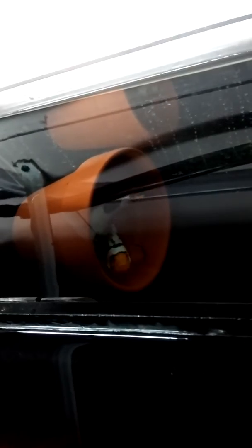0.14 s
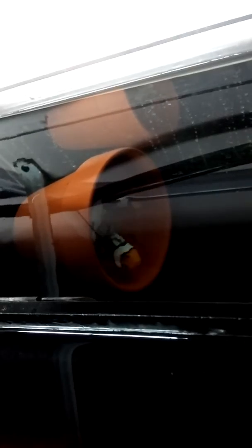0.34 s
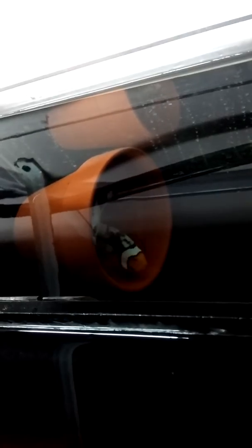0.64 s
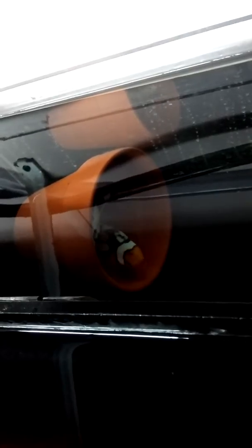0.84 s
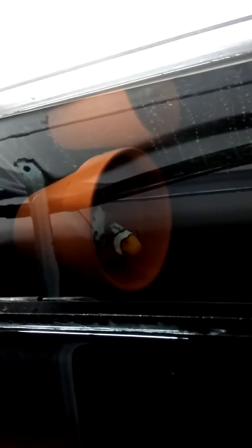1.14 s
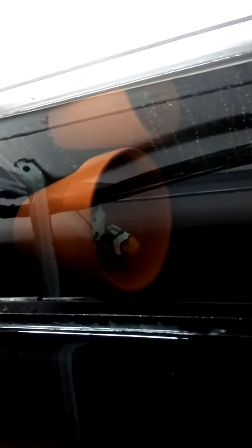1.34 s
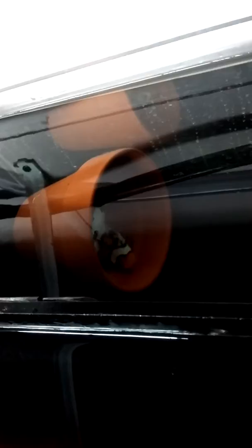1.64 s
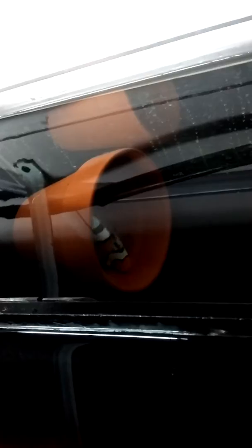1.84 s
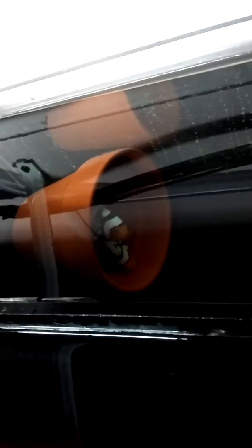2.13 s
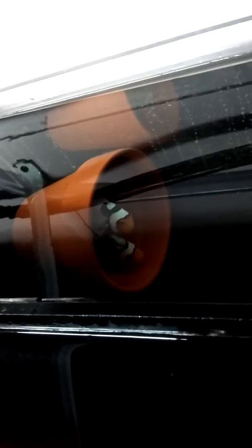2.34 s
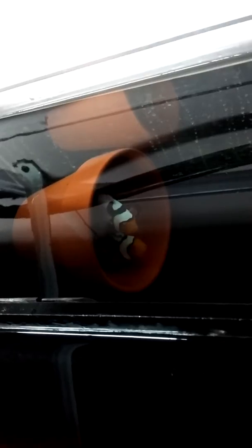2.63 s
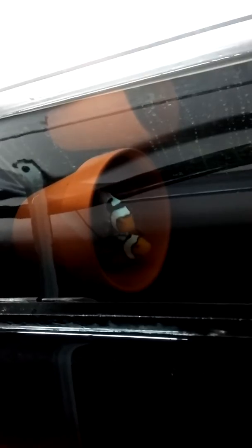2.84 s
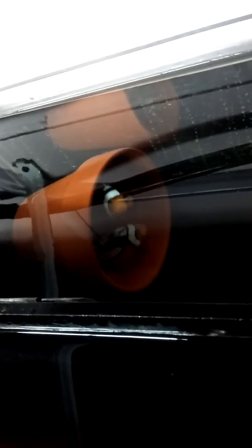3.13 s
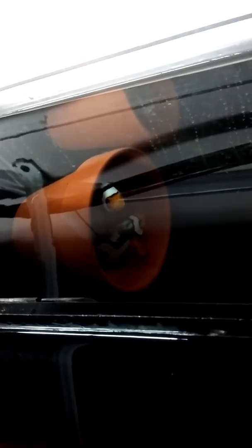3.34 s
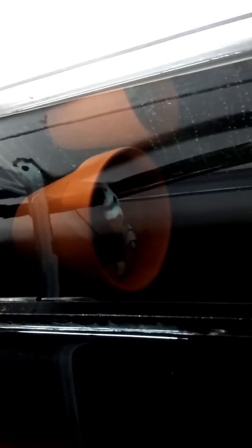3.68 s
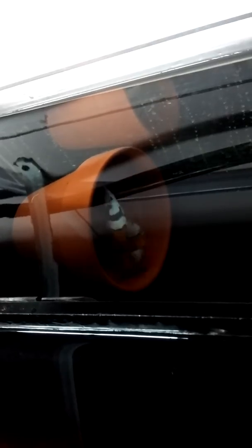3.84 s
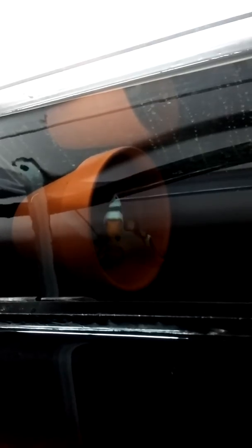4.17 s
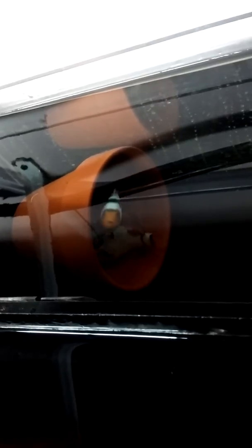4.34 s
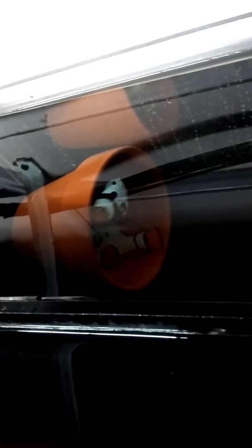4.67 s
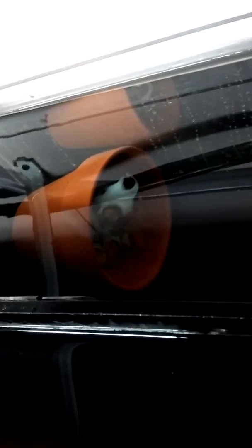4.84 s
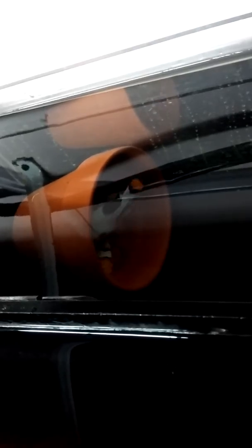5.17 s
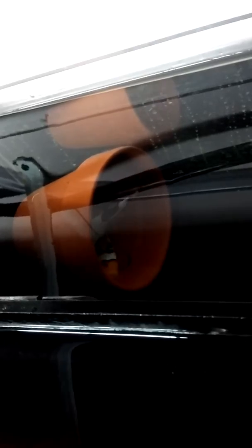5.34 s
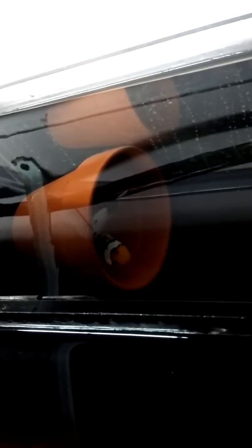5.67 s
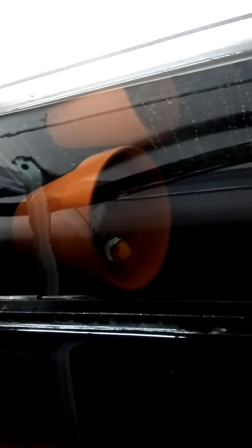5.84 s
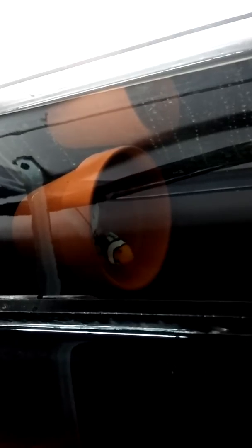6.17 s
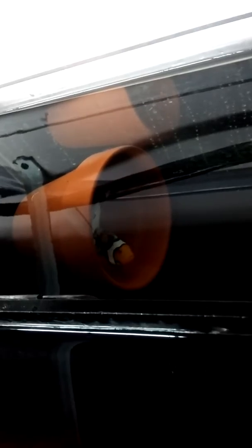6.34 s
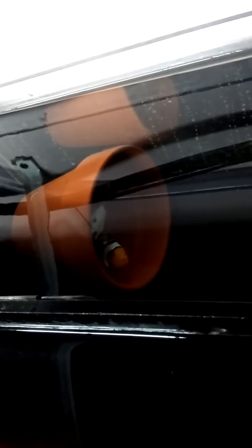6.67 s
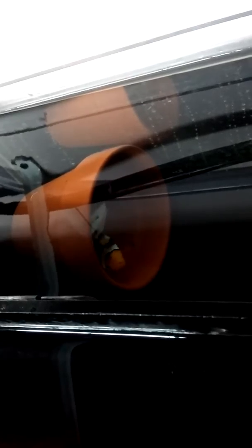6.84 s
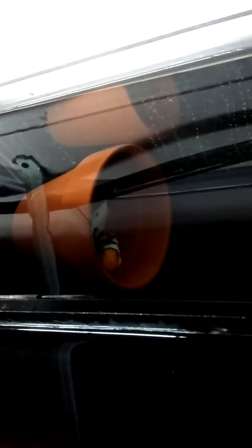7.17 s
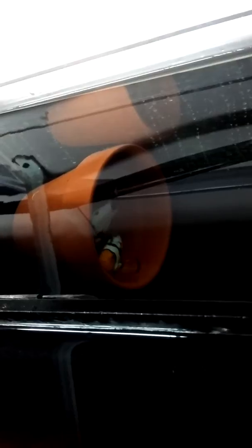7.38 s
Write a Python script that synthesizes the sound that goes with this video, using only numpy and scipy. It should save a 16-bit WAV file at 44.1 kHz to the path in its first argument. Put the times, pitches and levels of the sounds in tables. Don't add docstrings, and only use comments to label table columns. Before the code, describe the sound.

Indoors, close to a glass fish tank, water bubbles without pause over a low pump hum, two near-equal motor tones beating about eight times a second. From 0 to 1 s hollow mid-pitched plops come thickly, with bright, sharp drops around 0.55-0.65 s. Dull low hand thuds fall near 0.9, 2.0 and, hardest, 2.5 s, with fainter ones between. Bubbling thins slightly after 1.2 s, then bigger hollow gulps come at 1.6-2 s and spray ticks around 2.2 s. At about 2.6 s the microphone turns: water becomes quieter, darker and rounder, the hum more noticeable. From 3 to 6.5 s deep glugs alternate with small blips, and a busier cluster comes near 6 s. Brief gated dips make everything flutter, some almost silent. Crisp droplets return at 6.8, 7.1 and 7.3 s, and the churning continues to the end at about 7.5 s. Faint hiss; fine splashes lie to the right.

```python
import sys
import numpy as np
from scipy import signal
from scipy.fft import rfft, irfft, next_fast_len
from scipy.io import wavfile
from scipy.ndimage import uniform_filter1d

SR = 44100
rng = np.random.default_rng(int(sys.argv[2]) if len(sys.argv) > 2 else 0)


def ratio(d):
    e = np.asarray(d, float) / 20
    return 10 ** e


def digitize_waveform(pressure):
    field = np.atleast_2d(pressure).T
    bounded = np.clip(field, -1, 1)
    quanta = np.round(bounded * 32767).astype(np.int16)
    wavfile.write(sys.argv[1], SR, quanta)


N = 331191
TIME = np.arange(N) / SR
SIZE = next_fast_len(N + SR)
HZ = np.maximum(np.arange(SIZE // 2 + 1) * SR / SIZE, 1)
SIDES = np.array([[1], [-1]])


def rms_one(x):
    return x / np.sqrt(np.mean(x ** 2) + 1e-20)


def at_hz(points, hz):
    table = np.array(points)
    return np.interp(np.log(hz), np.log(table[:, 0]), table[:, 1])


def shaped(x, response):
    return irfft(rfft(x, SIZE) * response, SIZE)[..., :N]


def below(edge_hz):
    return 1 / (1 + (HZ / edge_hz) ** 4)


def wander(rate):
    knots = rng.standard_normal(400)
    return rms_one(np.interp(TIME * rate, np.arange(400), knots))


def after_turn():
    return np.interp(TIME, [2.58, 2.66], [0, 1])


def burst(hz, t60, rise, attack_s):
    t = np.arange(int(t60 * SR) + 200) / SR
    swell = 1 - np.exp(-(t / attack_s) ** 2)
    shape = swell * ratio(-60 * t / t60)
    return shape / shape.max() * np.sin(2 * np.pi * hz * t * (1 + rise * t / t60))


def add_at(out, start, sound):
    out[..., start:start + sound.shape[-1]] += sound


def room(x, t60):
    t = np.arange(SR // 2) / SR
    tail = rng.standard_normal((2, SR // 2)) * ratio(-60 * t / t60) * (t > .003)
    energy = np.sum(tail ** 2, 1, keepdims=True)
    return shaped(x, rfft(tail / np.sqrt(energy), SIZE))


def hiss():
    return ratio(-70) * shaped(rng.standard_normal((2, N)), below(9500)) * ratio(-3 * SIDES)


# frequency in Hz, peak level in dB, first crest in seconds.
HUM_TONES = [
    (120.015, -54.5, 0.00493),
    (160.505, -48.0, 0.00053),
    (168.86, -42.5, 0.00453),
    (180.04, -55.1, 0.00455),
    (360.06, -59.0, 0.00172),
]


def hum(gain_db):
    tones = sum(ratio(db) * np.cos(2 * np.pi * hz * (TIME - crest)) for hz, db, crest in HUM_TONES)
    return tones * ratio(gain_db + .5 * SIDES)


# start in seconds, peak level in dB, frequency in Hz.
HAND_KNOCKS = [
    (0.349, -58, 105),
    (0.909, -44, 98),
    (1.559, -66, 111),
    (2.002, -43.5, 97.7),
    (2.487, -39, 79),
]


def knocks():
    out = np.zeros(N + SR)
    for s, peak_db, hz in HAND_KNOCKS:
        thud = burst(hz, 0.13, rise=0, attack_s=0.0069)
        add_at(out, round(s * SR), ratio(peak_db) * thud)
    return out[:N]


# start in seconds, peak level in dB, frequency in Hz.
BIG_BUBBLES = [(0.517, -27, 780), (1.581, -22, 333), (1.802, -26, 780), (1.965, -27.5, 433),
               (2.11, -32, 424), (2.356, -34, 229), (2.526, -28.5, 770), (2.697, -38, 377),
               (3.048, -35, 361), (3.181, -31.5, 322), (3.437, -25, 213), (3.559, -29.5, 230),
               (3.704, -29.5, 225), (3.797, -24.5, 322), (4.216, -38, 230), (4.45, -25.5, 360),
               (4.587, -33, 260), (5.129, -23.5, 224), (5.414, -50, 222), (5.455, -25, 320),
               (5.935, -30, 760), (6.011, -36, 354), (6.08, -24.5, 229), (6.132, -24, 720),
               (6.536, -25, 215), (7.391, -24.5, 321)]


def glugs():
    out = np.zeros(N + SR)
    for s, peak_db, hz in BIG_BUBBLES:
        gulp = burst(hz, 40 / hz, rise=0.0072, attack_s=0.0046)
        add_at(out, round(s * SR), ratio(peak_db - 13.5) * gulp)
    return out[:N]


# start in seconds, lift in dB (negative:
CLUSTERS = [(0.037, -4.5), (0.172, 6), (0.345, 3.5), (0.832, 1.5), (1.118, 5.5), (1.639, 3), (1.956, 4.5),
            (2.408, -3), (2.527, -0.5), (2.688, -2.5), (2.8, 0.5), (3.047, 9), (3.175, 4), (3.59, 2),
            (4.107, -5), (4.475, 0), (4.62, 5), (5.369, 2.5), (5.455, 4), (5.905, 3), (6.01, 5.5),
            (6.797, 2), (7.035, 3.5), (7.2, 1.5), (7.335, 5), (7.48, 5.5)]


def surges():
    fade_s = 0.025
    return sum(lift_db * (TIME >= s) * np.exp(-np.maximum(TIME - s, 0) / fade_s) for s, lift_db in CLUSTERS)


def small_bubbles(per_s, spread_db, cycles):
    out, clumps = np.zeros(N), wander(25)
    for hz in np.geomspace(200, 12000, 30):
        crowding = ratio(2.5 * clumps + 3 * wander(14))
        rate = per_s / 30 * (1 + hz / 1500) ** .75 * crowding
        born = rng.random(N) < rate / SR
        strength_db = spread_db * min(hz / 900, 1) * np.minimum(rng.exponential(1, N), 3)
        ring = burst(hz, cycles / hz, rise=0.081, attack_s=3.54 / hz)
        rings = signal.oaconvolve(born * ratio(strength_db), ring)[:N]
        out += rms_one(rings) * np.sqrt(hz)
    return rms_one(out)


def tank(water, colour, modes):
    heard = rfft(water, SIZE) * colour
    out = irfft(heard, SIZE)[:, :N]
    numbered = list(enumerate(modes))
    for group in range(3):
        response = sum((-1) ** k * ratio(lift_db) / (1 + 1j * (HZ ** 2 - hz ** 2) / (HZ * width))
                       for k, (hz, width, lift_db) in numbered[group::3])
        out = out + irfft(heard * response, SIZE)[:, :N] * ratio(3 * wander(18) - 1)
    return out


# frequency in Hz, level in dB per Hz.
WATER_SPECTRUM = [(30, -22), (50, -11), (75, -4.5), (170, 3.5), (400, -19.5), (900, -24), (1900, -28),
                  (2600, -26), (3600, -27.5), (4400, -29), (6400, -35.5), (8500, -35.5), (9700, -44.5),
                  (13500, -50), (15600, -47)]
# frequency in Hz, change in dB.
COLOUR_BEFORE_TURN = [(40, 6), (90, 2.5), (250, -6.5), (480, -5), (900, -3.5), (2800, -4.5), (4800, -5.5),
                      (8300, -4)]
# frequency in Hz, left minus right in dB.
WATER_LEAN = [(60, -1), (150, 3), (380, -2), (950, -6.5), (2380, -4.5), (5980, -15), (15000, -25.5)]
# frequency in Hz, left-right likeness from 0 to 1.
CHANNEL_LIKENESS = [(60, 0.82), (180, 0.92), (550, 0.24), (1650, 0.31), (4970, 0.096), (15000, 0.0083)]
# frequency in Hz, width in Hz, lift in dB.
MODES_BEFORE_TURN = [(230, 22, -0.5), (321, 5.3, 15.5), (442, 105, 9), (545, 50, 12.5), (1129, 15, 14.5),
                     (1250, 32, 14), (1380, 57, 9.5), (1514, 28, 15.5), (2240, 117, 8), (2435, 42, 14),
                     (2890, 560, -5.5), (4080, 42, 7), (7540, 57, -7), (8330, 110, 6.5)]
# frequency in Hz, width in Hz, lift in dB.
MODES_AFTER_TURN = [(226.5, 2.6, 6), (322, 4.3, 13.5), (366.4, 21, 8), (587.3, 20.4, 13), (802, 13.5, 12),
                    (1013, 56, 11.5), (1250, 53, 11), (1555, 21, 18), (1752, 52, 12), (2240, 150, 13),
                    (2550, 86, 9), (2817, 166, 10.5), (4100, 104, -6), (7560, 180, 6)]


def churn(rumble_db, churn_db, fizz_db):
    bubbles = small_bubbles(per_s=400, spread_db=3.6, cycles=15)
    wash = rng.standard_normal((3, N)) * ratio(-14.5)
    other_path = signal.lfilter([-.7, 0, 0, 0, 0, 0, 1], [1, 0, 0, 0, 0, 0, -.7], bubbles)
    direct = np.stack([bubbles, other_path])
    reflections = room(bubbles, t60=.2)
    alike = at_hz(CHANNEL_LIKENESS, HZ)
    shared = shaped(wash[0] + bubbles * ratio(-10), np.sqrt(alike))
    apart = shaped(wash[1:] + direct * ratio(-13) + reflections * ratio(-11), np.sqrt(1 - alike))

    colour = ratio(at_hz(WATER_SPECTRUM, HZ) + at_hz(WATER_LEAN, HZ) / 2 * SIDES)
    early = tank(shared + apart, colour * ratio(at_hz(COLOUR_BEFORE_TURN, HZ)), MODES_BEFORE_TURN)
    late = tank(shared + apart, colour, MODES_AFTER_TURN)
    turned = after_turn()
    water = early * (1 - turned) + late * turned

    low = rms_one(shaped(water, below(1050)))
    middle = rms_one(shaped(water, below(2970) - below(522)))
    high = rms_one(shaped(water, 1 - below(3360)))
    return ratio(rumble_db - 0.5) * low + ratio(churn_db + 0.66) * middle + ratio(fizz_db + 2) * high


# start in seconds, peak in dB, Hz, left
# minus right in dB.
LARGE_BUBBLES = [(0.036, -44, 1430, -1), (0.302, -33.5, 1216, 4), (0.478, -36.5, 1380, 7),
                 (0.743, -29.5, 1385, -4), (0.831, -30.5, 1250, 8), (1.193, -39.5, 1480, -9),
                 (1.639, -44, 1350, -3), (1.836, -43, 762, 8), (1.86, -33, 1250, 5.5),
                 (2.355, -43.5, 1525, -18), (2.409, -41, 1480, -5), (2.602, -43, 1580, -25),
                 (2.622, -47, 1520, -4), (3.185, -41.5, 1013, -7), (3.594, -43, 1250, -2),
                 (4.106, -41, 1475, 0), (4.573, -39.5, 1400, -1), (5.125, -42, 1157, 8),
                 (5.369, -43, 1085, 4), (5.455, -42, 1250, 8), (5.501, -40.5, 1514, -19),
                 (6.125, -40, 943, -7), (6.64, -37.5, 954, -9), (0.882, -40, 721, -6),
                 (0.658, -38, 1216, 5), (2.3, -44.5, 523, -11), (7.25, -44, 780, 3), (7.335, -43, 1796, 20),
                 (7.356, -42, 1570, -19),
                 (0.053, -45, 1880, 13), (0.091, -45.5, 523, -5), (0.192, -40, 1200, 8),
                (0.346, -45, 1220, 1), (0.347, -47, 1810, 0), (0.547, -48, 1380, -5), (0.569, -42, 1130, 7),
                (0.668, -33.5, 1440, -7), (0.886, -45, 1190, 3), (1.024, -42.5, 416, 3),
                (1.156, -38, 1480, -15), (1.26, -41.5, 1456, -12), (1.454, -47, 1236, 1),
                (1.674, -44, 1020, -11), (1.731, -50.5, 1280, 1), (2.026, -43, 1580, -14),
                (2.095, -42, 1444, -16), (2.112, -52, 407, -8), (2.145, -44, 1440, -16),
                (2.148, -49, 516, 0), (2.447, -38, 1460, -13), (2.526, -48, 1770, -11),
                (2.692, -46.5, 1265, -3), (3.2, -48, 1740, 8), (3.297, -44.5, 1730, -16),
                (3.334, -44.5, 1020, -11), (3.434, -43.5, 1010, -8), (3.586, -46, 805, 3),
                (3.654, -45, 1180, -11), (4.059, -49, 740, -6), (4.111, -48, 1300, 8),
                (4.132, -44, 1250, 6), (4.377, -44.5, 850, 8), (4.405, -50, 1150, 8),
                (4.906, -43.5, 1250, 5), (5.151, -41.5, 1270, 4), (5.246, -48, 1280, -2),
                (5.431, -42.5, 1256, 1), (5.455, -38, 998, -11), (5.81, -41.5, 1573, -17),
                (5.906, -45, 1610, -16), (5.93, -44, 1460, -23), (6.028, -46.5, 744, 0),
                (6.082, -44, 758, -1), (6.386, -46, 1015, -14), (6.675, -42.5, 826, -10),
                (7.074, -43.5, 943, -12), (7.206, -41.5, 1796, -18), (7.286, -45, 795, -6),
                (7.368, -47, 960, -4)]
# start in seconds, peak in dB,
# frequency in Hz.
OUTLET_BUBBLES = [(0.243, -36, 2890), (0.294, -33.5, 2890), (0.303, -33, 2280), (0.464, -38, 2185),
                  (0.744, -33.5, 2440), (0.481, -40, 2890), (0.867, -38, 2335), (1.394, -32, 2890),
                  (1.655, -39, 2240), (1.811, -34, 2240), (1.862, -44, 3030), (1.861, -44, 2690),
                  (2.412, -45, 2490), (3.296, -41.5, 2360), (3.607, -40, 2240), (3.769, -42.5, 2040),
                  (4.08, -45.5, 2240), (4.272, -39.5, 2450), (4.326, -39, 2240), (4.724, -42, 3280),
                  (5.045, -37.5, 2470), (5.479, -44, 2430), (6.082, -41.5, 2740), (6.638, -43, 2530),
                  (7.058, -40.5, 2460),
                  (0.196, -49, 2910), (0.347, -40, 2240), (0.349, -45, 2930), (0.395, -34, 2240),
                (0.516, -37.5, 2216), (0.832, -32.5, 2280), (0.886, -55, 2950), (0.887, -44.5, 2350),
                (0.942, -50, 3340), (1.05, -39, 2400), (1.119, -45, 2370), (1.416, -45, 2880),
                (1.638, -45.5, 2880), (2.009, -51, 2700), (2.039, -45, 2350), (2.604, -45, 2240),
                (2.709, -58, 3400), (2.746, -49, 2450), (2.871, -51, 2460), (3.056, -52, 3320),
                (3.074, -55, 3400), (3.201, -61, 3400), (3.426, -52, 2930), (3.457, -51, 2700),
                (3.813, -49, 2950), (3.991, -39, 2460), (4.024, -55, 2260), (4.157, -43, 2215),
                (4.487, -46.5, 2620), (4.78, -44.5, 2220), (4.889, -52, 3300), (4.907, -47, 2470),
                (5.016, -61, 2930), (5.18, -50.5, 3030), (5.456, -42, 2200), (5.485, -52, 3380),
                (5.554, -47, 2380), (5.696, -47, 2205), (5.931, -42, 2240), (5.968, -47, 2590),
                (6.044, -46, 2240), (6.281, -41, 2330), (6.349, -53, 3210), (6.602, -46, 2900),
                (6.758, -46, 2410), (6.795, -54, 2700), (7.2, -45, 2520), (7.335, -44, 2540)]
# start in seconds, peak in dB, frequency in
# Hz.
FALLING_DROPS = [(0.437, -35, 5650), (0.549, -22.5, 4200), (0.55, -27, 5970), (0.585, -32, 4820),
                 (0.626, -19, 4360), (0.682, -36, 4650), (0.886, -35.5, 5370), (0.885, -43.5, 4640),
                 (0.946, -35, 5660), (0.997, -31.5, 5400), (1.388, -41, 5600), (1.578, -41.5, 4360),
                 (1.652, -39.5, 4010), (1.995, -42.5, 4360), (2.228, -40.5, 5600), (2.357, -40.5, 5500),
                 (2.947, -38.5, 5030), (3.329, -40, 4400), (4.479, -42.5, 4730), (4.622, -41, 4540),
                 (5.251, -42.5, 4500), (5.81, -40.5, 5720), (6.054, -42.5, 4400), (6.809, -28, 5440),
                 (7.285, -33, 5250), (7.287, -43.5, 4100), (7.337, -40, 4970), (7.363, -40.5, 4900),
                 (0.198, -45, 4310), (0.217, -42, 5900), (0.322, -41, 5990), (0.358, -34, 7840),
              (0.362, -43, 5630), (0.449, -35, 8400), (0.843, -42.5, 5500), (0.854, -48, 4400),
              (0.934, -40, 5500), (1.303, -39, 5540), (1.409, -42, 6310), (1.46, -42, 5500),
              (1.596, -52, 4300), (1.841, -49, 4040), (1.862, -51, 5940), (1.953, -43.5, 3880),
              (2.02, -40, 7870), (2.202, -42, 5500), (2.378, -49, 4820), (2.447, -45, 7700),
              (2.464, -49, 7670), (2.61, -39, 7500), (2.71, -47, 4230), (2.749, -38, 8150),
              (2.807, -42, 8100), (2.844, -52, 4800), (2.967, -42, 7500), (3.191, -52, 4350),
              (3.457, -53, 4000), (3.584, -56, 7560), (3.651, -37.5, 7700), (3.67, -51, 4550),
              (3.69, -51, 3860), (3.807, -45, 5350), (3.811, -48, 4050), (3.849, -41, 8300),
              (3.853, -46, 4930), (4.117, -39, 7400), (4.502, -45, 4830), (4.62, -58, 7410),
              (4.66, -51, 4470), (4.766, -49.5, 4800), (5.246, -43, 7300), (5.388, -47, 4100),
              (5.479, -50, 4190), (5.691, -45, 5770), (5.722, -42, 6360), (5.779, -40.5, 5920),
              (5.905, -45, 9410), (5.91, -49, 4860), (6.022, -48, 7280), (6.039, -42, 5560),
              (6.041, -50, 4460), (6.057, -39, 7800), (6.379, -53, 3640), (6.911, -40, 6200),
              (7.255, -50, 4340), (7.312, -53, 5260), (7.41, -42.5, 6270), (7.483, -45, 4400)]
# start in seconds, peak in dB, frequency in Hz.
LID_SPRAY = [(0.172, -32, 7340), (0.195, -44, 7500), (0.547, -39, 6800), (0.653, -29, 7000),
             (1.646, -37, 7100), (1.677, -34.5, 7440), (1.841, -39, 6600), (2.199, -29, 6800),
             (2.22, -32, 8530), (2.359, -36, 6730), (2.829, -30.5, 7300), (3.706, -34, 8000),
             (4.13, -33.5, 8330), (4.146, -36, 7140), (4.622, -52, 8050), (5.248, -37.5, 6050),
             (5.923, -33.5, 7560), (6.021, -30, 8300), (6.802, -33, 8600), (7.075, -33, 7130),
             (7.074, -31, 8300), (7.334, -27.5, 7450)]
# frequency in Hz, left minus right in dB.
SMALL_BURST_LEAN = [(2200, -10.5), (2900, -1.5), (4300, -6), (5500, -22), (7000, -48.5)]
# frequency in Hz, t60 in seconds.
RING_TIME = [(800, 0.037), (1400, 0.023), (2500, 0.014), (4500, 0.0085), (8000, 0.0012)]


def pop_rows():
    usual_db, longest_db = -34, 4.5
    spray = [(s, db - 3, hz) for s, db, hz in LID_SPRAY]
    small = OUTLET_BUBBLES + FALLING_DROPS + spray
    placed = LARGE_BUBBLES + [(s, db, hz, at_hz(SMALL_BURST_LEAN, hz)) for s, db, hz in small]
    return [(s, db, hz, at_hz(RING_TIME, hz) * ratio(min(usual_db - db, longest_db)), lean_db)
            for s, db, hz, lean_db in placed]


def film_splash(hz, wide, spray):
    age = np.arange(400)
    band = signal.butter(2, [hz / 1.2 / wide, hz * 1.35 * wide], "band", fs=SR, output="sos")
    splash = signal.sosfilt(band, spray * np.hanning(400) * np.exp(-age / 130))
    crack = np.diff(spray, 2, prepend=[0, 0]) * np.exp(-age / 45)
    splash = splash + ratio(-25) * np.abs(splash).max() * crack
    return splash / np.abs(splash).max()


def pops():
    rings, splashes = np.zeros((2, 2, N + SR))
    for s, peak_db, hz, t60, lean_db in pop_rows():
        spray = rng.standard_normal(400)
        ringing = burst(hz, np.clip(1.6 * t60, .006, .3), rise=0.011, attack_s=0.0013)
        impurity_db = 6.5 * max(np.log2(hz / 4330), 0)
        wide = np.clip(2050 / hz, 1, 1.6)
        splash = film_splash(hz, wide, spray)
        gains = ratio(peak_db + 5 + np.minimum(np.clip(lean_db, -16, 8) * SIDES, 0))
        at = round(s * SR)
        left_delay = abs(int(1.4 * spray[0]))
        for side, start in enumerate([at + left_delay, at]):
            add_at(rings[side], start, gains[side] * ringing * ratio(-impurity_db))
            add_at(splashes[side], start, gains[side] * ratio(-8.5) * wide * splash)
        for wait, detune in spray[1:7].reshape(3, 2):
            sister = burst(hz * (1 + 0.085 * detune), 18 / hz + 0.014, rise=0.02, attack_s=0.002)
            start = at + int((0.029 + 0.042 * abs(wait)) * SR)
            sister_db = -19 - 3 * abs(wait) - .3 * max(peak_db + 35, 0)
            add_at(rings, start, gains * ratio(sister_db) * sister)
    rings, splashes = rings[:, :N], splashes[:, :N]
    return rings + splashes + room(ratio(-10) * rings + ratio(1) * splashes, t60=.18)


# time in seconds, pump nearness in dB, water vigour in dB.
MICROPHONE_DRIFT = [(0.0, -1, -43), (0.92, 0, -40), (1.32, -2, -44.5), (1.63, 1.5, -43.5),
                    (2.318, -5.5, -49), (2.38, 0, -41.5), (2.93, -2.5, -55), (3.91, 2, -49), (5.0, 3, -50),
                    (6.0, 2, -50), (7.13, 3, -50.5), (7.38, 0, -49.5), (7.51, 0.5, -51)]


def scene():
    s, *columns = np.transpose(MICROPHONE_DRIFT)
    hum_db, churn_db = [np.interp(TIME, s, c) for c in columns]
    mean_db = churn_db.mean()
    swing_db, turned, lift_db = churn_db - mean_db, after_turn(), surges()
    rumble_db = mean_db - 3.5 + 4 * turned + 0.68 * swing_db
    fizz_db = mean_db - 7 - 1.56 * turned + 0.9 * swing_db
    water = churn(rumble_db + 0.6 * lift_db, churn_db + lift_db, fizz_db + lift_db)
    return hum(hum_db) + knocks() + glugs() + water + pops()


# deepest moment in seconds, depth in dB, length in seconds.
GATE_CLOSINGS = [(0.168, 8.5, 0.072), (0.284, 8.5, 0.18), (0.739, 9, 0.08), (1.098, 6, 0.33),
                 (1.233, 9, 0.033), (1.341, 8.5, 0.14), (1.939, 11.5, 0.12), (2.084, 15, 0.036),
                 (2.185, 6.5, 0.048), (2.27, 2.5, 0.12), (2.403, 16, 0.014), (2.51, 7, 0.041),
                 (2.669, 36, 0.063), (2.781, 7, 0.037), (2.898, 24, 0.043), (3.028, 23, 0.089),
                 (3.139, 18.5, 0.13), (3.256, 11.5, 0.083), (3.391, 17, 0.073), (3.529, 15.5, 0.11),
                 (3.968, 7.5, 0.27), (4.202, 7.5, 0.14), (4.361, 5.5, 0.12), (4.444, 24.5, 0.076),
                 (4.706, 25.5, 0.092), (5.319, 26, 0.1), (5.653, 26, 0.075), (6.251, 21.5, 0.091),
                 (6.508, 25.5, 0.067), (6.595, 6, 0.17)]
# deepest moment in seconds, depth in dB.
GATE_FLUTTERS = [(0.4, 6), (0.668, 6.5), (1.505, 0.5), (1.79, 5), (3.64, 2.5), (3.744, 3.5), (4.54, 3),
                 (4.807, 3.5), (5.083, 2), (5.415, 4), (5.999, 0.5), (6.722, 5.5), (6.871, 6), (6.965, 4),
                 (7.119, 0), (7.46, 4)]


def gate(dry):
    flutter_s, closing_share = 0.14, 0.52
    point = 1.7
    duck_db = np.zeros(N)
    for s, depth_db, length in GATE_CLOSINGS + [(s, db, flutter_s) for s, db in GATE_FLUTTERS]:
        corners = [s - closing_share * length, s, s + (1 - closing_share) * length]
        duck_db -= depth_db * np.interp(TIME, corners, [0, 1, 0]) ** point
    level_db = 10 * np.log10(uniform_filter1d(np.mean(dry ** 2, 0), size=400) + 1e-12)
    lull_db = 0.45 * np.clip(level_db + 38.5, -8, 0)
    return dry * ratio(uniform_filter1d(duck_db + lull_db, size=200))


def roll_off(x):
    return signal.sosfilt(signal.butter(12, 15710, fs=SR, output="sos"), x)


def record(dry):
    mix = shaped(gate(dry) + hiss(), HZ < 15710)
    return roll_off(mix)


dry = scene()
out = record(dry)
digitize_waveform(out)
```